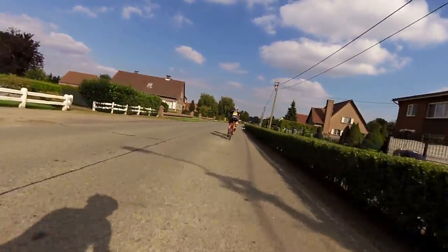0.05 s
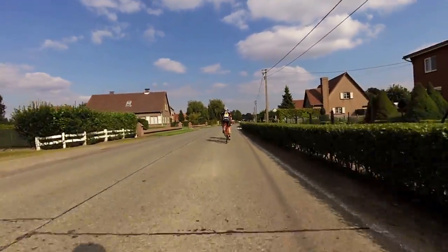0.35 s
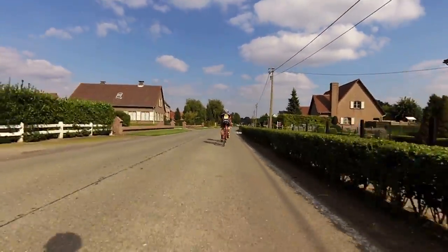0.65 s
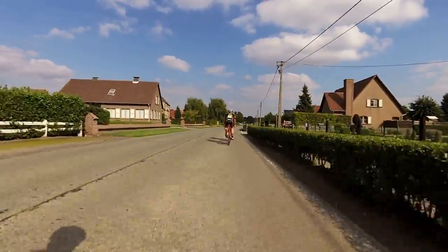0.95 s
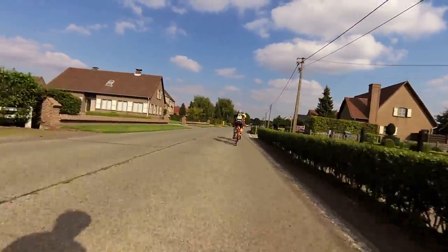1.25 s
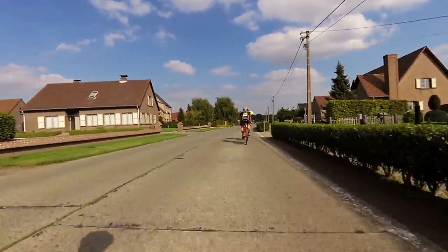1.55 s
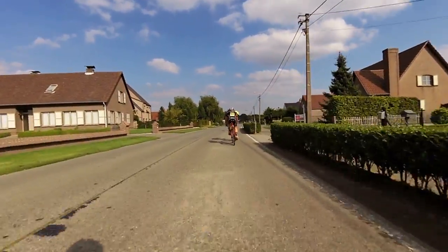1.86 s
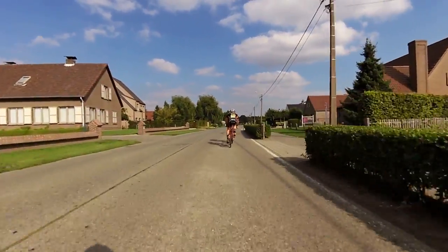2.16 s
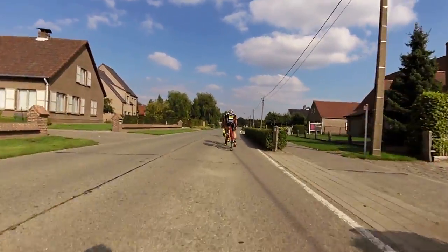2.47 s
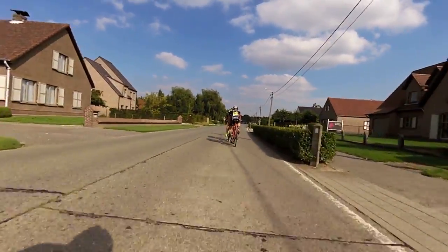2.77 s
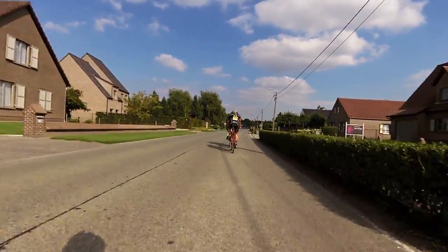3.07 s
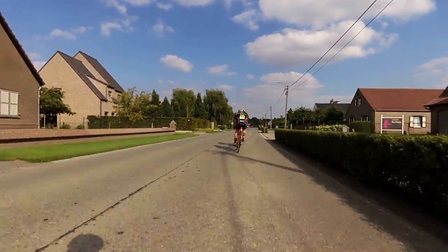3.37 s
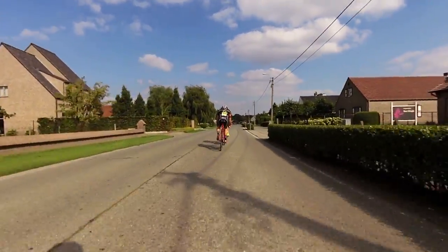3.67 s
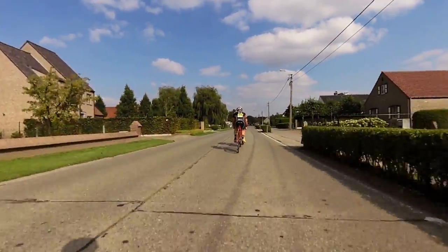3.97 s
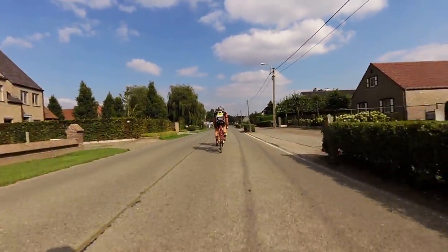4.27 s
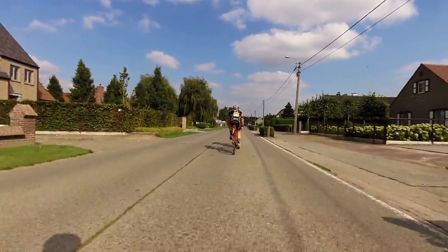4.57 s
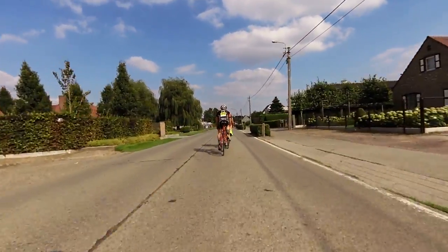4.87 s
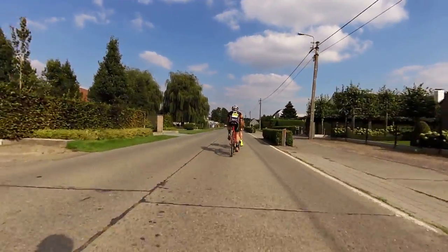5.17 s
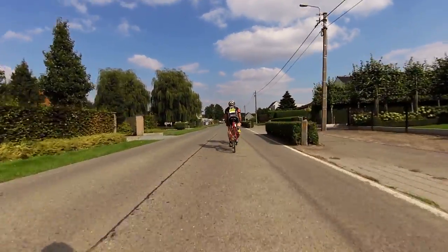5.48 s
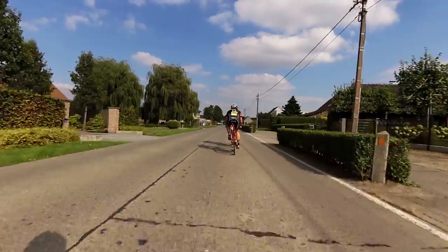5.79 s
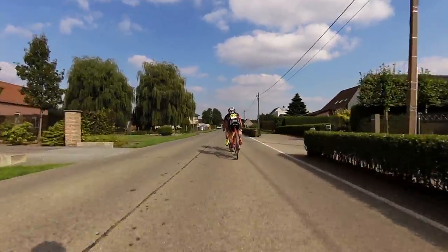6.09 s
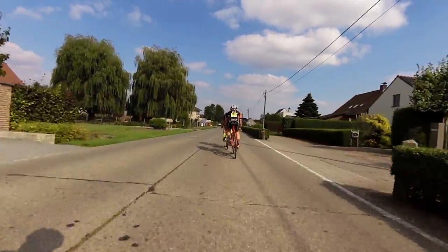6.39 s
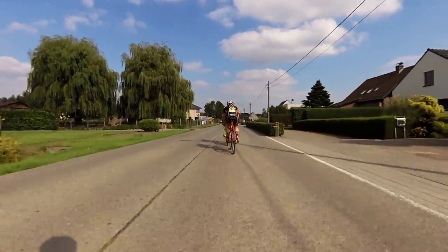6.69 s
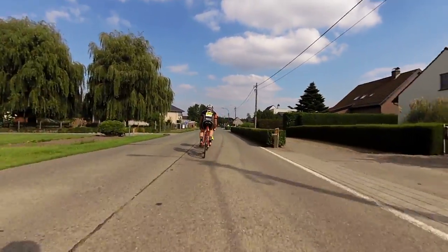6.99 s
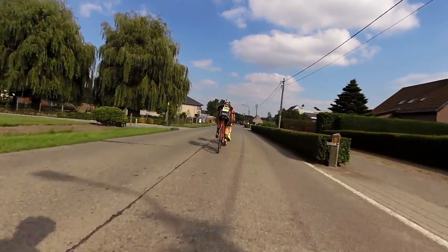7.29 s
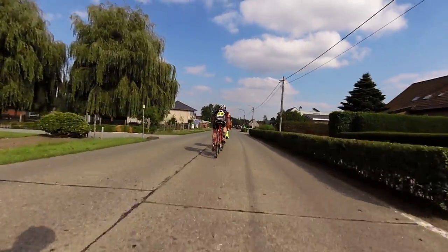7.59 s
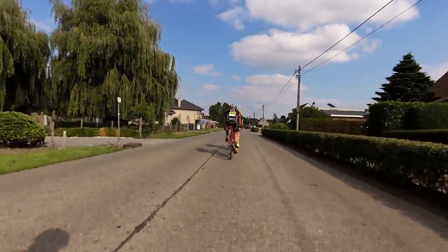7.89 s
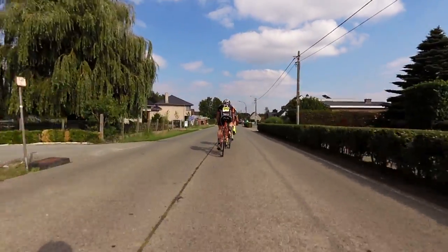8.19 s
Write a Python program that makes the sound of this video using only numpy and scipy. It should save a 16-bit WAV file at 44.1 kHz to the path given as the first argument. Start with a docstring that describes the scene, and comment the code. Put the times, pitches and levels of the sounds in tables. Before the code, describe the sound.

A racing bicycle rolls fast over a paved road for about eight and a half seconds, heard from a microphone inside a case riding on it. A low rumble and a humming frame drone continue throughout, throbbing about three times a second. Wind buffets the case with an uneven flutter, over soft, muffled tyre hiss and faint ticks of sand. The chain sizzles faintly in the first second. A sharp knock and click land at 0.4 seconds, then a stone pings on the metal at 0.5. Smaller bumps keep knocking through the mount. From 2.6 to 3.5 seconds rough road brings hollow judders, more pings and a firm knock. Loose parts click at 4.3 seconds and, after a smoother stretch, chatter briefly around 6.7. Another bump hits at 7.6, and a quick run of knocks and clatter follows from 7.9 to 8.4 as the rolling continues.

```python
"""A racing bicycle's frame drones and rumbles as it rolls fast over a paved road.
The rough road shakes the frame, and the drone throbs with each turn of the wheel.
We hear it from a camera riding along in a case: wind buffets the case, and bumps knock
and judder through its mount. Loose parts click and flung stones ping on the metal,
while the tyres hiss, the chain sizzles and sand ticks faintly behind it all."""
import sys
import numpy as np
from scipy import signal
from scipy.fft import rfft, irfft
from scipy.io import wavfile

SR = 44100
rng = np.random.default_rng(int(sys.argv[2]) if len(sys.argv) > 2 else 0)


def store_wav(level_fs):
    """Save 16-bit WAV to argv[1]."""
    pcm = np.round(np.clip(np.atleast_2d(level_fs), -1, 1) * 32767)
    wavfile.write(sys.argv[1], SR, pcm.T.astype(np.int16))


N = 372644
TIME = np.arange(N) / SR


def gain_of(db):
    """Turns decibels into a number to multiply a sound by."""
    return 10 ** (np.asarray(db) / 20)


def evened(x):
    """Scales a signal so that its average size (rms) is 1."""
    return x / np.sqrt(np.mean(x ** 2) + 1e-20)


def curve(rows):
    """Joins (time_s, value) points with straight lines."""
    return np.interp(TIME, *np.transpose(rows))


def swell(times, rises_db, width_s):
    """Brief bell-shaped rises in level, in dB; a negative rise is a dip."""
    return sum(db * np.exp(-((TIME - s) / width_s) ** 2 / 2) for s, db in zip(times, rises_db))


def spells(rows):
    """A volume that rises and falls in one arch for each row."""
    return sum(gain_of(db) * np.sin(np.pi * np.clip((TIME - start_s) / length_s, 0, 1))
               for start_s, length_s, db in rows)


def add(mix, start_s, sound):
    """Mixes a sound in at start_s."""
    part = mix[max(round(start_s * SR), 0):][:len(sound)]
    part += sound[:len(part)]


def coloured(x, tone):
    """Makes each pitch in x louder or softer, following (pitch_hz, level_db) points; rms 1."""
    pitch_hz, level_db = np.transpose(tone)
    hz = np.fft.rfftfreq(N, 1 / SR)
    shape_db = np.interp(np.log(hz + 1), np.log(pitch_hz), level_db)
    return evened(irfft(rfft(x) * gain_of(shape_db), N))


def wander(rate_hz):
    """A smooth random wobble, up to about rate_hz fast; rms 1."""
    hz = np.fft.rfftfreq(N, 1 / SR)
    return evened(irfft(rfft(rng.standard_normal(N)) * hz / (hz + 4) / (1 + (hz / rate_hz) ** 2), N))


def steadied(x, span_s):
    """Irons out changes in loudness slower than span_s."""
    window = np.hanning(max(int(span_s * SR), 64))
    power = np.pad(x ** 2, len(window), "reflect")
    local_power = signal.fftconvolve(power, window / window.sum(), "same")[len(window):][:N]
    return x / np.sqrt(local_power + 1e-9)


def resonate(x, hz, width_hz):
    """Makes x ring at a fixed or moving pitch; a narrower width rings longer; rms 1."""
    turn = np.exp(2j * np.pi * np.cumsum(hz * np.ones(N)) / SR)
    decay = np.exp(-np.pi * width_hz / SR)
    return evened((turn * signal.lfilter([1], [1, -2 * decay, decay * decay], x / turn)).real)


def tiny_taps(per_s, spread_db):
    """Taps of uneven size at random moments, like stones under a tyre; rms 1."""
    size = gain_of(spread_db * np.minimum(rng.exponential(1, N), 4))
    return evened(size * rng.choice([-1., 1.], N) * (rng.random(N) < per_s / SR))


def snap(noise, start_s, peak_s):
    """A very short burst cut from a noise, loudest after peak_s."""
    t = np.arange(4000) / SR
    return noise[round(start_s * SR):][:len(t)] * t / peak_s * np.exp(-t / peak_s)


# a grain of sand heard through the case: pitch_hz, level_db
SAND_TONE = [(1000, -11), (2000, 1.5), (2900, 3), (4600, 3), (5300, -5), (6400, -22), (7300, -17),
             (8200, -31.5), (10000, -43), (13000, -57)]

def sand(level_db=-70.5):
    """Sand flung up by the tyres ticks dryly on the frame and case."""
    return gain_of(level_db) * coloured(tiny_taps(per_s=30, spread_db=4.0), SAND_TONE)


def pebbles(level_db=-66.5):
    """Small stones snap out from under the tyres with dull, dry ticks."""
    return gain_of(level_db) * resonate(tiny_taps(per_s=22, spread_db=1.0), hz=3550, width_hz=750)


# when the chain sizzles: start_s, length_s, level_db
SIZZLES = [(0.12, 0.34, -59.5), (0.72, 0.43, -60.5)]

def chain():
    """Links rub on the cogs: many tiny taps ring at one bright pitch."""
    return spells(SIZZLES) * resonate(tiny_taps(per_s=1500, spread_db=3.0), hz=4520, width_hz=340)


# how the tyre hiss rises and falls: time_s, level_db
HISS_LEVELS = [(0.0, -53.5), (0.2, -54.5), (0.32, -52.5), (0.5, -55.5), (0.7, -55.5), (0.9, -54.5),
               (1.1, -57), (1.25, -56.5), (2.4, -55.5), (3.0, -58.5), (3.9, -56), (5.4, -56), (6.8, -53),
               (7.2, -57), (8.45, -56)]
# the tone of that hiss: pitch_hz, level_db
HISS_TONE = [(300, -5), (1000, 10), (1600, 7.5), (2000, 2.5), (2500, -0.5), (2850, 1.5), (3120, -5.5),
             (3450, -2.5), (4550, -3.5), (5000, -13.5), (5600, -24), (6500, -32), (7150, -30),
             (8000, -43.5), (10000, -51.5), (12000, -57), (13500, -63)]

def tyres(rush_db, trim_db=5.5, flutter_db=2.0, rush_share=0.37):
    """Rubber hisses on stone, muffled by the case; it flutters and swells with the rushing noise."""
    hiss = coloured(tiny_taps(per_s=8000, spread_db=4.0), HISS_TONE)
    level_db = curve(HISS_LEVELS) + trim_db + rush_share * rush_db
    return hiss * gain_of(level_db + flutter_db * wander(rate_hz=47))


# when loose parts chatter: start_s, length_s, level_db
RATTLES = [(0.552, 0.052, -50), (4.276, 0.034, -51), (6.712, 0.036, -46), (6.8, 0.03, -52),
           (7.9, 0.031, -48)]
# that chatter heard through the case: pitch_hz, level_db
RATTLE_TONE = [(500, -13.5), (900, 3), (1600, 14), (2300, 2), (2900, 6), (3500, -0.5), (4700, -6),
               (5600, -8), (7200, -25.5), (8300, -45), (13000, -57)]

def rattles():
    """Shaken cables and loose parts chatter against the frame for a moment."""
    return spells(RATTLES) * coloured(tiny_taps(per_s=1400, spread_db=2.5), RATTLE_TONE)


# sharp blows that make the plastic mount tick: start_s, level_db
CRACKS = [(0.3695, -46), (4.2765, -53), (4.2888, -55), (7.5695, -55)]
# the tone of that tick: pitch_hz, level_db
CRACK_TONE = [(5000, -13), (7500, -10), (8600, -2.5), (10000, -3.5), (12100, -5), (13500, -20.5)]

def cracks():
    """The mount slips a hair with a thin, very bright tick."""
    out = np.zeros(N)
    noise = coloured(rng.standard_normal(N), CRACK_TONE)
    for start_s, db in CRACKS:
        add(out, start_s, gain_of(db) * snap(noise, start_s, peak_s=0.0006))
    return out


# the notes the case rings with: pitch_hz, level_db, fade_s (time to fall by 60 dB)
CASE_NOTES = [(1560, 4, 0.017), (1900, -1, 0.051), (2250, 2, 0.03), (2700, 6, 0.025), (2840, -12.5, .02),
              (3360, -3, 0.022), (3680, -1.5, 0.018), (4060, -2.5, 0.053), (4120, -1, .04),
              (4140, -12, 0.05), (4230, -1.5, 0.02), (4800, -1.5, 0.03), (4500, -11, 0.11),
              (5500, -7.5, 0.026), (6000, -20, 0.008), (7100, -17, 0.016), (6900, -14, 0.0086),
              (8500, -30, 0.013)]

def case_ring(part_hz, focus_db, fade_factor, part_db=2.0, part_fade_s=0.035):
    """A small part rings and stirs the case's notes; more focus favours those near its own pitch."""
    t = np.arange(4000) / SR
    hz, db, fade_s = np.transpose(list(CASE_NOTES) + [(part_hz, part_db, part_fade_s)])[:, :, None]
    octaves_away = np.minimum(abs(np.log2(hz / part_hz)), .5)
    volume = gain_of(db - focus_db * octaves_away - 60 * t / (fade_s * fade_factor))
    notes = volume * np.sin(2 * np.pi * (hz * t + rng.random(hz.shape)))
    sound = notes.sum(0) * (1 - np.exp(-(t / .00028) ** 2))
    return sound / np.sqrt(np.sum(sound ** 2) / (.002 * SR))  # as much energy as 2 ms at rms 1


# taps of loose parts, and a few faint ticks of sand on the case: start_s, level_db, pitch_hz,
# focus_db_per_octave, fade_factor, snap_db
CLICKS = [(0.288, -40, 4900, 4, .44, -5), (0.3695, -19, 1630, 38, .25, -18),
          (0.5713, -21, 2980, 7, .6, -24), (0.5935, -28, 2780, 31, .67, -26),
          (0.8115, -40, 3600, 29, .3, -26), (0.864, -48, 4400, 10, .3, 0), (1.229, -38, 3600, 26, .3, -26),
          (1.906, -37, 3610, 24, .3, -24), (1.7586, -35, 3460, 13, .5, -10.5),
          (1.8117, -25.5, 3120, 21, .42, -4.5), (1.9158, -48.5, 3900, 12.5, .3, 0.5),
          (2.199, -45, 4400, 7, .3, 1), (2.546, -33, 3230, 19, .31, -7), (2.951, -40, 3600, 30, .4, -24),
          (3.0575, -39, 3420, 12, .4, -9), (3.3685, -43, 4400, 7, .3, 1), (3.854, -33, 3470, 16, .4, -6),
          (4.0764, -51, 4400, 9, .3, 1), (4.2768, -20, 3560, 16, .42, -14),
          (4.2884, -20, 4130, 8, 0.35, -19), (4.31, -30, 4660, 4, .55, -11),
          (5.103, -36, 2660, 4.5, .6, -9), (6.053, -37, 4750, 43, 1.3, -18), (6.088, -43, 4400, 7, .3, -3),
          (6.094, -38, 4300, 23, .5, -24), (6.1615, -43, 4420, 8, .3, 3), (6.2557, -32, 3630, 16, 0.37, -6),
          (6.376, -43.5, 4500, 9, .3, 3.5), (6.73, -27.5, 3100, 14, .4, -14),
          (6.736, -26.5, 3300, 3, 0.32, -12), (6.737, -27, 4730, 51, 1.4, -27.5),
          (6.7602, -26.5, 4440, 9, 0.31, -21), (6.779, -43, 4800, 30, .4, -20),
          (6.81, -36, 4500, 5, .3, -10), (6.813, -26.5, 2800, 23, .4, -20), (6.828, -41, 4400, 7, .35, -9),
          (6.8315, -36, 2600, 26, .35, -28), (7.04, -46, 4400, 7, .3, 1), (7.5697, -36, 1800, 16, .3, -16),
          (7.727, -32.5, 1800, 30.5, .3, -26), (7.941, -29, 2540, 9, .4, -10),
          (7.959, -33, 3250, 16, .4, -14), (8.3586, -38, 2940, 11.5, .6, 1)]
# the dry snap in each tap: pitch_hz, level_db
SNAP_TONE = [(800, -3.5), (2000, -12.5), (5000, 2), (6300, -0.5), (7300, -0.5), (8400, -18), (10000, -25),
             (12000, -30.5), (14000, -47)]

def clicks(trim_db=-7.0, push_db=-4.5, push_s=0.00074):
    """Loose parts tap, and grains of sand tick faintly: a dry snap and a short ring on top of a low push."""
    out = np.zeros(N)
    crackle = coloured(rng.standard_normal(N), SNAP_TONE)
    for start_s, db, part_hz, focus_db, fade_factor, snap_db in CLICKS:
        ring = case_ring(part_hz, focus_db, fade_factor)
        t = np.arange(len(ring)) / SR
        push = t / push_s * (2 - t / push_s) * np.exp(-t / push_s) * (1 - np.exp(-t / 0.00023))
        tick = gain_of(snap_db) * snap(crackle, start_s, peak_s=0.00076)
        add(out, start_s, gain_of(db + trim_db) * (ring + gain_of(push_db) * push + tick))
    return out


# stones hitting the frame: start_s, level_db, favoured_pitch_hz, focus_db_per_octave, fade_factor
PINGS = [(0.0795, -22, 4050, 4, 1.08), (0.5198, -16.5, 4400, 2, 0.76), (2.7666, -37, 4400, 30, .6),
         (2.7758, -15.5, 4300, 44, 0.53), (2.778, -24.5, 4710, 161.5, 1), (3.1535, -31, 4400, 12, .5),
         (3.157, -25.5, 4300, 45, 0.52)]
# the notes the metal rings with: pitch_hz, level_db, fade_s (time to fall by 60 dB)
METAL_NOTES = [(1800, -10, .009), (2750, -13.5, .012), (3490, -3.5, 0.02), (3800, -15, .014),
               (4040, -7, 0.042), (4250, 4, 0.018), (4370, -13, .04), (4710, -13, 0.058),
               (4970, -17.5, .008), (5940, -23, 0.016), (7060, -15, 0.015), (7480, -27.5, .016),
               (8420, -29.5, .012), (9500, -39.5, .008), (10500, -46, .007), (11800, -49.5, .006)]

def pings(attack_s=0.00053, reach_octaves=0.19):
    """A flung stone rings the metal frame; the spot it hits decides which notes are strongest."""
    out, t = np.zeros(N), np.arange(6000) / SR
    hz, note_db, fade_s = np.transpose(METAL_NOTES)[:, :, None]
    attack = 1 - np.exp(-(t / attack_s) ** 2)
    for start_s, db, spot_hz, focus_db, fade_factor in PINGS:
        weight_db = note_db - focus_db * np.minimum(abs(np.log2(hz / spot_hz)), reach_octaves)
        notes = gain_of(weight_db - 60 * t / (fade_s * fade_factor)) * np.sin(2 * np.pi * hz * t)
        add(out, start_s, gain_of(db) * notes.sum(0) * attack)
    return out


# rough patches of road: start_s, length_s, level_db
ROUGH_PATCHES = [(2.65, 0.11, -30.5), (2.8, 0.074, -37), (2.98, 0.054, -29), (7.297, 0.024, -25),
                 (8.13, 0.14, -34), (8.333, 0.1, -35)]
# the notes the mount clatters with: pitch_hz, width_hz, level_db
MOUNT_NOTES = [(700, 170, 3.5), (910, 240, -4.5), (1480, 260, -11.5)]

def judders():
    """On rough patches the mount clatters in a quick run of hollow taps."""
    taps = tiny_taps(per_s=500, spread_db=6.0)
    clatter = sum(gain_of(db) * resonate(taps, hz, width) for hz, width, db in MOUNT_NOTES)
    muffled = coloured(clatter, [(1800, -3), (3500, -20.5), (7000, -41)])
    return spells(ROUGH_PATCHES) * steadied(muffled, span_s=0.08)


# bumps in the road: time_s, knock_db, pitch_hz, knock_width_ms, thud_db
BUMPS = [(0.2909, -10, 450, 0.85, -29), (0.3235, -19, 950, 0.25, -10), (0.3705, 0, 520, 0.28, -11),
         (0.3894, -4, 450, 0.67, -34), (0.387, -19.5, 950, 1.5, -30), (0.9148, -20.5, 725, 1.4, -27),
         (1.1859, -19, 550, 1.1, -20), (1.2698, -12, 450, 0.37, -30), (1.3292, -7, 450, 0.47, -7),
         (1.4003, -13, 775, 0.65, -13), (1.5622, -9, 500, 0.49, -16), (1.5971, -18.5, 700, 0.6, -29),
         (1.7372, -13.5, 625, 0.41, -21.5), (1.969, -11.5, 500, 1.2, -23), (2.089, -19.5, 540, 1.3, -22.5),
         (2.2721, -12.5, 575, 0.54, -6), (2.4827, -13, 625, 0.47, -27), (2.5977, -8.5, 450, 0.34, -24),
         (2.663, -6, 450, 0.27, -24), (2.6728, -13, 675, 0.23, -31), (2.697, -16, 500, 0.5, -29),
         (2.733, -6, 450, 0.33, -21.5), (2.7466, -14.5, 650, 0.5, -32), (2.807, -15.5, 550, 1, -28),
         (2.8303, -10, 450, 0.56, -31.5), (2.951, -10, 450, 0.7, -22), (2.9956, -13, 700, 0.39, -18),
         (3.006, -12, 475, 0.31, -31), (3.063, -13, 540, 0.7, -32), (3.0788, -14, 550, 0.6, -30),
         (3.1584, -17, 525, 0.43, -32), (3.2532, -14, 600, 0.72, -17.5), (3.3752, -16.5, 575, 1.4, -15),
         (3.4357, -1, 450, 0.43, -16), (3.444, -9, 450, 0.21, -33), (3.5981, -8, 475, 0.48, -29),
         (3.6329, -11, 600, 0.56, -33), (4.1852, -13.5, 450, 0.53, -16), (4.292, -13.5, 775, 0.3, -30),
         (4.6037, -13.5, 477, 0.56, -23), (4.8207, -16.5, 875, 0.31, -30), (4.8819, -18.5, 775, 0.7, -12),
         (5.007, -13.5, 517, 0.58, -32), (5.36, -8, 500, 0.56, -17), (5.431, -18.5, 750, 0.32, -27),
         (6.7462, -13, 450, 0.23, -21), (6.7628, -16, 450, 0.13, -19), (7.2287, -12.5, 500, 0.8, -26),
         (7.3135, -8.5, 520, 0.49, -30), (7.572, -4, 450, 0.55, -10), (7.9201, -17.5, 850, 1.2, -12),
         (7.9393, -14, 450, 0.17, -26), (8.0489, -3.5, 450, 0.33, -11), (8.1519, -13, 530, 0.7, -30),
         (8.1587, -23.0, 850, 1.4, -38), (8.1821, -6.5, 475, 0.42, -22), (8.1918, -16, 775, 0.25, -22),
         (8.2167, -11, 750, 0.52, -23), (8.2316, -11, 450, 0.54, -21), (8.2427, 0.5, 500, 0.49, -24),
         (8.246, -9, 525, 0.55, -22), (8.2628, -10.5, 625, 0.41, -24), (8.3589, -17, 650, 0.45, -20.5)]
# the mount's shudder after a bump: pitch_hz, level_db
SHUDDER_TONE = [(200, -15), (500, 10.5), (800, -2), (1200, -10.5), (1700, -17), (2400, -26.5),
                (4000, -52.5), (9000, -88)]

def bumps(thud_trim_db=-4.0, thud_s=0.0014, shudder_db=-5.5, shudder_s=0.009):
    """Each bump jerks the mount with a short knock and a loose shudder, and the frame thuds."""
    out = np.zeros(N)
    lead_s = .008  # a knock starts to build before its peak
    t = np.arange(0, 8 * lead_s, 1 / SR) - lead_s
    age = np.maximum(t, 0) / thud_s
    thud = np.sin(age) * age * np.exp(-age / 2)
    noise = coloured(rng.standard_normal(N), SHUDDER_TONE)
    for time_s, knock_db, hz, width_ms, thud_db in BUMPS:
        knock = np.sin(2 * np.pi * hz * t) / np.cosh(t * 1000 / width_ms)
        shudder = noise[round(time_s * SR):][:len(t)] * (1 - np.exp(-age)) * np.exp(-t / shudder_s)
        shudder *= gain_of(shudder_db) * np.linalg.norm(knock) / np.linalg.norm(shudder)
        bump = gain_of(knock_db) * (knock + shudder) + gain_of(thud_db + thud_trim_db) * thud
        add(out, time_s - lead_s, rng.choice([-1, 1]) * bump)
    return out


# slow gusts of wind: time_s, level_db
GUSTS = [(0.0, -39.5), (0.3, -33.5), (0.6, -37.5), (1.3, -34), (1.6, -38), (2.5, -34.5), (2.72, -37.5),
         (3.1, -40.5), (3.4, -35.5), (4.6, -36.5), (6.0, -36.5), (7.1, -37), (8.0, -37), (8.3, -36),
         (8.45, -39)]
# brief surges and dips in the rushing noise as the bicycle crosses rough road: time_s, rise_db
ROUGH_SURGES = [(0.3, 3.5), (0.388, 5.5), (1.29, 7), (1.55, 8.5), (1.74, 8.5), (2.485, -4), (2.668, 4),
                (2.734, 3.5), (2.827, 10), (2.892, 9.5), (3.003, 8), (3.07, 4.5), (3.15, 14), (3.258, 10.5),
                (3.444, 5.5), (3.611, 7.5), (4.201, 10), (4.32, 6), (5.015, -2), (6.75, 11.5), (7.31, 3),
                (7.51, 8.5), (7.575, 4), (7.928, 3), (8.16, 5), (8.19, -4), (8.255, -2), (8.359, 14)]

def rush_level(lumps_db=2.0):
    """How the rushing noise rises and falls, in dB: slow gusts, random lumps and rough-road surges."""
    slow_db = curve(GUSTS) - curve(GUSTS).mean()
    surge_db = swell(*np.transpose(ROUGH_SURGES), width_s=0.014)
    return slow_db + lumps_db * wander(rate_hz=20.0) + surge_db


# wind on the case: pitch_hz, level_db
WIND_TONE = [(60, -24), (250, 2.5), (450, 6.5), (620, 1), (780, -3), (950, -15), (1200, -10.5), (1400, -22),
             (1700, -25.5), (2100, -39), (3000, -50.5), (5000, -73), (10000, -94)]

def wind(rush_db, level_db=-31.5, flutter_db=5.0):
    """Swirls of air break on the case, making a rushing noise with a fast, uneven flutter."""
    swirls = rng.standard_normal(N) * gain_of(flutter_db * np.tanh(wander(rate_hz=460)))
    return steadied(coloured(swirls, WIND_TONE), span_s=0.12) * gain_of(level_db + rush_db)


# how hard the road shakes the bicycle: time_s, level_db
RUMBLE_LEVELS = [(0.0, -21.5), (1.5, -22.5), (3.2, -21.5), (4.3, -21.5), (5.8, -23.5), (6.7, -22.5),
                 (7.6, -23), (8.45, -20.5)]
# the tone of that shaking: pitch_hz, level_db
RUMBLE_TONE = [(15, -52.5), (30, -24), (45, -12.5), (58, 1), (78, -3), (108, 3), (135, 6), (200, 3),
               (260, 0.5), (400, -3.5), (560, -8.5), (680, -30.5), (1000, -19.5), (9000, -115)]
# jolts from dips in the road, also felt in the drone: time_s, drone_rise_db, rumble_rise_db
JOLTS = [(0.04, 10.5, -5), (0.329, -9, 10), (0.847, 6.5, 3.5), (0.925, 5, 5.5), (1.575, 6.5, 8),
         (1.801, -19.5, 8), (2.1, -11, 5), (2.32, 5.5, -5), (2.597, 7, 2), (2.9, 3.5, -1), (3.748, 6, -3),
         (4.191, -1, 1.5), (4.54, 5, -3), (4.819, 6.5, 3), (5.17, 7.5, -2.5), (5.302, 10, 0.5),
         (5.365, -11.5, 2.5), (5.43, 6.5, -7), (5.76, 3.5, 2.5), (6.479, 1.5, 4.5), (6.731, 4, 7.5),
         (7.046, 1.5, 1), (7.49, -4, 7.5), (7.72, 4.5, -10), (7.925, 6.5, 5.5), (8.19, 11, 4.5),
         (8.356, 11, 0.5)]

def rumble(jolt_db):
    """The uneven road shakes the whole bicycle; the level jumps or drops briefly at each jolt."""
    shake = coloured(tiny_taps(per_s=900, spread_db=5.5), RUMBLE_TONE)
    return steadied(shake, span_s=0.43) * gain_of(curve(RUMBLE_LEVELS) + jolt_db)


# how the frame's drone rises and falls: time_s, level_db
DRONE_LEVELS = [(0.0, -23), (0.4, -21.5), (1.0, -21), (2.4, -19), (3.35, -23.5), (3.9, -18.5), (4.3, -21),
                (4.7, -20.5), (6.9, -18.5), (7.4, -21.5), (7.8, -18), (8.45, -24)]
# how the tyre's rubber softens each stone's push: pitch_hz, level_db
CUSHION = [(1500, -0.5), (4800, 0), (6500, -12), (12000, -34)]
# higher notes of the frame and mount: pitch_hz, width_hz, level_db
FRAME_NOTES = [(417, 26, -34.5), (488.7, 52, -41.5), (516, 36, -34), (1102, 55, -49), (1248.3, 58, -52.5),
               (1468, 47, -59.5), (1565, 85, -57.5), (2830, 220, -66.5), (4460, 400, -68.5)]

def frame(rush_db, jolt_db, drone_hz=329, sway_hz=3.5, waver_hz=7.1,
          turns_per_s=3.11, throb_db=1.17, trim_db=-0.93, rush_share=0.33):
    """Road stones keep the frame droning; its level and pitch swing once per wheel turn."""
    wheel_angle = 2 * np.pi * turns_per_s * (TIME - 0.009)
    pitch_hz = drone_hz + sway_hz * np.sin(wheel_angle) + waver_hz * wander(rate_hz=6.9)
    stones = coloured(tiny_taps(per_s=900, spread_db=3.5), CUSHION)
    drone = steadied(resonate(stones, pitch_hz, width_hz=50.5), span_s=0.14)
    drone_db = curve(DRONE_LEVELS) + trim_db + throb_db * np.cos(wheel_angle) + jolt_db
    fine_stones = coloured(tiny_taps(per_s=2500, spread_db=0.5), CUSHION)
    high_notes = sum(gain_of(db) * resonate(fine_stones, hz, width) for hz, width, db in FRAME_NOTES)
    return drone * gain_of(drone_db) + high_notes * gain_of(rush_share * rush_db)


def scene(jolt_s=0.018):
    """Everything reaches one microphone inside the case."""
    rush_db = rush_level()
    jolt_times, drone_rises_db, rumble_rises_db = np.transpose(JOLTS)
    bicycle = rumble(swell(jolt_times, rumble_rises_db, jolt_s))
    bicycle += frame(rush_db, swell(jolt_times, drone_rises_db, jolt_s))
    rolling = bicycle + wind(rush_db) + tyres(rush_db) + chain()
    hits = bumps() + judders() + cracks() + clicks() + pings() + rattles() + sand() + pebbles()
    return (rolling + hits)[None]


def record(dry, low_cut_hz=40.0, ceiling=.72, top_hz=14300):
    """The deepest bass is dropped, loud knocks are rounded off, and nothing is left above about 14 kHz."""
    bass_cut = signal.butter(N=3, Wn=low_cut_hz, btype="high", fs=SR, output="sos")
    thinned = signal.sosfilt(bass_cut, dry)
    rounded = thinned / (1 + (thinned / ceiling) ** 8) ** (1 / 8)
    top_limit = signal.firwin(511, top_hz, window=("kaiser", 9), fs=SR)
    return signal.oaconvolve(rounded, top_limit[None], "same")


dry = scene()
out = record(dry)
store_wav(out)
```